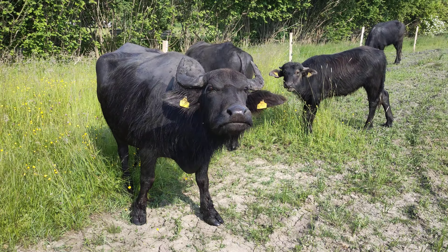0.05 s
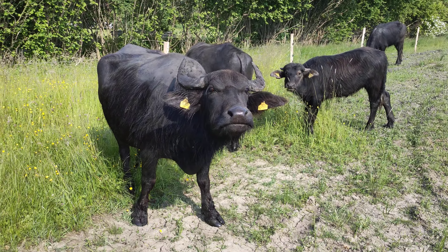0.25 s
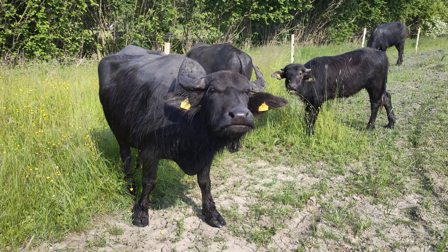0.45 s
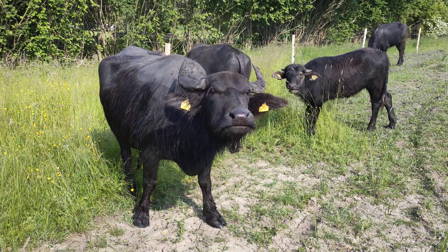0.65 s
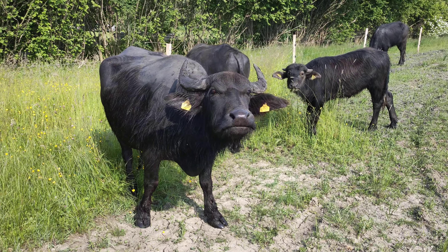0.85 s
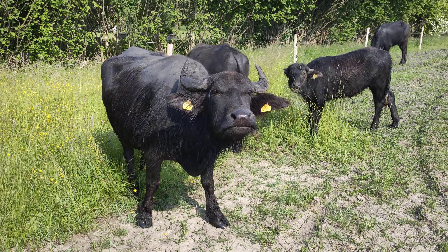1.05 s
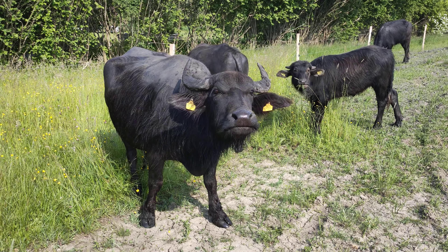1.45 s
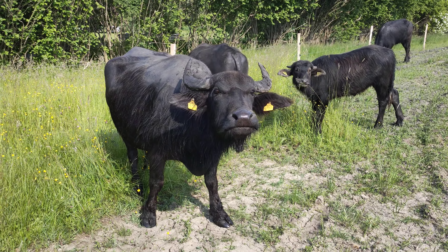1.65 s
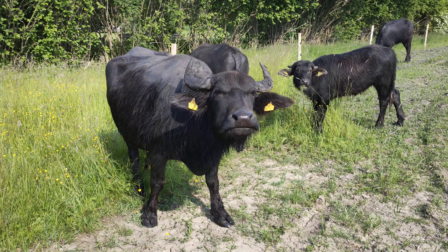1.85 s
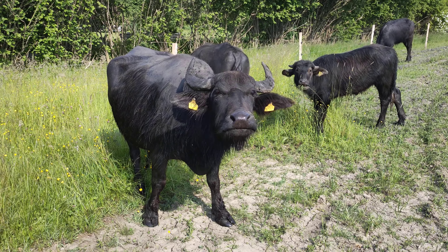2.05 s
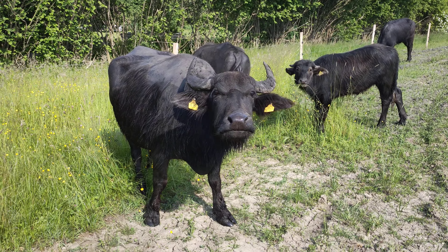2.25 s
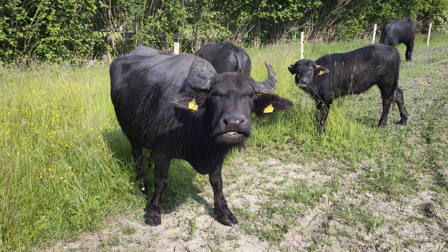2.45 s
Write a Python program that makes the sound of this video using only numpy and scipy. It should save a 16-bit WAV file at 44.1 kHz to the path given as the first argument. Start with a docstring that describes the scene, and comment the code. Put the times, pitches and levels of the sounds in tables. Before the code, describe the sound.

Wind buffets the microphone with an uneven low rumble over faint meadow hiss. From about 0.25 seconds come dull thumps and ragged pops, strongest near 0.6, where a stalk snaps; distant birds chirp faintly. Dry grass rustles and ticks softly around 1 to 1.2 seconds. Gusts swell again from 1.5 to 1.8, then ease, with a faint grassy swish near 2.1 and more far chirps at 2.4.

```python
"""Wind buffets a microphone in a meadow where buffalo stand.
From the start the grass hisses, far birds call and turbulent eddies press on the ports as a lumpy rumble.
From 0.25 s come dull thumps, swirls and ragged pops that ring at the edge of a steep low cut.
A stalk snaps at 0.6 s, dry grass rustles and ticks near 1 s, and the gusts swell again at 1.5-1.8 s.
As they ease, a swish crosses the grass and the birds chirp once more."""
import sys
import numpy as np
from scipy import signal
from scipy.fft import rfft, irfft
from scipy.io import wavfile
from scipy.ndimage import uniform_filter1d

SR = 44100
rng = np.random.default_rng(int(sys.argv[2]) if len(sys.argv) > 2 else 0)


def wav_record(signal):
    """Record a signal, one row per channel, as 16-bit PCM in the file named by sys.argv[1]."""
    frames = np.transpose(np.atleast_2d(signal))
    bounded = np.clip(frames, -1, 1)
    # unit amplitude maps onto the largest positive 16-bit level
    quanta = np.round(bounded * 32767).astype(np.int16)
    wavfile.write(sys.argv[1], SR, quanta)


N = 110250
T, HZ = np.arange(N) / SR, np.fft.rfftfreq(N, 1 / SR)


def amp(db):
    """Amplitude ratio of a level in decibels."""
    return 10 ** (np.asarray(db) / 20)


def unit_rms(x):
    """Normalisation to unit mean power."""
    return x / np.sqrt(np.mean(x ** 2) + 1e-20)


def colour(points):
    """Spectral envelope, interpolated in dB over log frequency."""
    hz, db = np.transpose(points)
    return amp(np.interp(np.log(HZ + 1), np.log(hz), db))


def level(points):
    """Amplitude envelope, interpolated in dB over time."""
    return amp(np.interp(T, *np.transpose(points)))


def drift(rate_hz):
    """Random modulation: low-passed noise of rms 1."""
    return unit_rms(irfft(rfft(rng.standard_normal(N)) * np.exp(-(HZ / rate_hz) ** 2), N))


def noise(gain, coherence):
    """Partial coherence: two ports receive the sum and difference of two coloured noises."""
    mid, side = irfft(rfft(rng.standard_normal((2, N))) * gain, N)
    mid, side = mid * np.sqrt(1 + coherence), side * np.sqrt(1 - coherence)
    return unit_rms(np.array([mid + side, mid - side]))


def eddies(spectrum, coherence, lump_db, lump_hz, span_s):
    """Intermittency: pressure comes in quick lumps whose power holds steady over a longer span."""
    pressure = noise(colour(spectrum), coherence) * amp(lump_db * drift(lump_hz))
    size = int(span_s * SR)
    power = uniform_filter1d(uniform_filter1d((pressure ** 2).mean(0), size), size)
    return pressure / np.sqrt(abs(power) + 1e-9)


# Spectra of the steady hiss and the swishes. Each row: frequency in Hz, relative level in dB.
HISS_SPECTRUM = [(120, -33), (250, -36), (400, -15), (470, -15.5), (700, -12), (1100, -8), (1350, -13),
                 (1800, -14), (2750, -23), (4000, -20.5), (6000, -26.5), (7600, -24), (8800, -34),
                 (11000, -29.5), (12600, -32.5), (13500, -26.5), (15500, -27.5)]
SWISH_SPECTRUM = [(2000, -7), (3200, -8), (4400, 3), (5800, -11), (7700, 4.5), (8700, -12), (11000, -5),
                  (12500, -11), (13600, -3), (16000, -7)]
# Waves of hiss. Each row: centre in seconds, level in dB, Gaussian half width in seconds.
SWISH_WAVES = [(0.24, -72.5, 0.14), (1.918, -75, 0.089), (2.131, -64.5, 0.076)]


def grass():
    """Flow noise: air over the grass makes a steady hiss and passing swishes."""
    hiss = amp(-66) * noise(colour(HISS_SPECTRUM), coherence=0.068)
    waves = sum(amp(db) * np.exp(-.5 * ((T - s) / half) ** 2) for s, db, half in SWISH_WAVES)
    return hiss + waves * noise(colour(SWISH_SPECTRUM), coherence=0.18)


# Pressure of large, medium and fine eddies. Each row: time in seconds, relative level in dB.
RUMBLE_LEVELS = [(0.0, -70), (0.14, -40), (0.2, -66), (0.24, -41), (0.28, -44.5), (0.33, -37), (0.35, -53),
                 (0.41, -48.5), (0.5, -50.5), (0.55, -53), (0.58, -37.5), (0.77, -44), (0.79, -40.5),
                 (0.84, -54.5), (0.99, -39), (1.18, -42), (1.2, -54.5), (1.27, -39.5), (1.36, -49),
                 (1.43, -38.5), (1.48, -44.5), (1.51, -34), (1.55, -49), (1.59, -33.5), (1.63, -44),
                 (1.68, -32.5), (1.73, -51.5), (1.77, -38), (1.83, -45), (1.93, -53.5), (2.08, -38),
                 (2.28, -60), (2.35, -58.5), (2.38, -43.5), (2.5, -59)]
BUFFET_LEVELS = [(0, -79), (.15, -52.5), (.21, -78), (.25, -43.5), (.3, -56), (.36, -67), (.55, -71.5),
                 (.58, -47), (.67, -45), (.83, -70.5), (.91, -42), (.95, -55.5), (1.12, -44), (1.21, -65),
                 (1.27, -50.5), (1.3, -64.5), (1.4, -39.5), (1.46, -61), (1.56, -30), (1.62, -45),
                 (1.645, -40.5), (1.68, -35), (1.73, -58), (1.77, -34.5), (1.91, -69), (1.96, -52.5),
                 (2.18, -47.5), (2.22, -68.5), (2.36, -73), (2.39, -55), (2.5, -75)]
FLUTTER_LEVELS = [(0, -72.5), (.22, -69.5), (.255, -53), (.305, -57), (.33, -45), (.365, -35.5), (.38, -50),
                  (.44, -43), (.51, -42), (.58, -47.5), (.62, -35.5), (.668, -52), (.69, -44.5), (.74, -65),
                  (.82, -66), (.865, -41.5), (.91, -52), (1.02, -64), (1.048, -45), (1.08, -65),
                  (1.16, -43.5), (1.21, -60), (1.26, -47), (1.35, -60.5), (1.39, -48.5), (1.44, -60),
                  (1.5, -53), (1.55, -44), (1.61, -52), (1.665, -34.5), (1.72, -56), (1.76, -49),
                  (1.95, -62), (2.01, -44.5), (2.07, -46.5), (2.12, -53.5), (2.3, -66), (2.5, -71)]
# Their spectra. Each row: frequency in Hz, relative level in dB.
RUMBLE_SPECTRUM = [(10, -21.5), (25, -8.5), (42, -3), (57, 0), (85, -4.5), (125, -7.5), (170, -17.5),
                   (260, -39.5), (450, -72), (900, -100)]
BUFFET_SPECTRUM = [(70, -33), (150, -1.5), (250, 0.5), (340, -10), (430, -14.5), (600, -38), (1200, -80)]
FLUTTER_SPECTRUM = [(300, -50.5), (420, -22.5), (475, 8.5), (650, -2), (900, -11), (1200, -19.5),
                    (1650, -22), (2200, -37), (3200, -71.5)]


def wind():
    """Coherence grows with eddy size: large eddies reach both ports alike, fine ones less so."""
    rumble = level(RUMBLE_LEVELS) * eddies(RUMBLE_SPECTRUM, 1, lump_db=2.5, lump_hz=25.3, span_s=0.038)
    buffet = level(BUFFET_LEVELS) * eddies(BUFFET_SPECTRUM, 1, lump_db=7, lump_hz=55.4, span_s=0.027)
    fine = eddies(FLUTTER_SPECTRUM, 0.79, lump_db=2.5, lump_hz=110, span_s=0.054)
    flutter = level(FLUTTER_LEVELS) * fine
    return amp(2) * rumble + amp(-1.5) * buffet + amp(-2.5) * flutter


# Far bird calls. Each row: start and length in seconds, centre pitch in Hz,
# glide as a fraction of that pitch, relative level in dB.
BIRD_CALLS = [(.198, .02, 3600, .15, -67), (.218, .02, 3480, -.22, -67), (.306, .024, 3550, -.2, -57),
              (.373, .022, 3620, .14, -59), (.398, .022, 3530, -.15, -61), (.484, .022, 3750, -.18, -61),
              (.512, .03, 3800, .1, -60), (.563, .03, 3450, -.18, -60), (.642, .028, 6050, -.1, -73),
              (1.283, .025, 5230, .01, -71), (1.518, .085, 5230, .055, -69.5),
              (2.382, .02, 3250, -.22, -65), (2.394, .014, 4130, -.12, -61), (2.431, .017, 4130, .05, -61),
              (2.448, .028, 3350, -.33, -62), (.0, .15, 1390, -.01, -58.5), (.69, .17, 1745, .01, -65),
              (2.41, .07, 1520, .03, -64)]


def birds(rasp_hz=380, trees_t60_s=.28):
    """Reverberation: clear glides arrive directly while their rasp lingers among the trees."""
    song = np.zeros(N)
    for start, length, hz, glide, db in BIRD_CALLS:
        progress = np.clip((T - start) / length, 0, 1)
        pitch = hz * (1 + glide * (progress - .5))
        song += amp(db) * np.sin(np.pi * progress) * np.sin(2 * np.pi * np.cumsum(pitch) / SR)
    tail = rng.standard_normal((2, SR // 2)) * np.exp(-np.log(1000) * T[:SR // 2] / trees_t60_s)
    rasp = song * drift(rasp_hz)
    reverb = signal.fftconvolve(rasp[None], tail / np.linalg.norm(tail[0]), axes=1)[:, :N]
    return amp(-5.5) * song + amp(-4.5) * reverb


# Bands of far sound. Each row: centre and half length in seconds, pitch and half width in Hz,
# level in dB.
HAZE_BANDS = [(.15, .45, 1900, 550, -70), (.3, .08, 4900, 900, -73), (.43, .25, 3750, 550, -72.5),
              (1.83, .05, 3800, 550, -74), (2.44, .08, 4150, 900, -75)]


def far_haze():
    """Narrow-band noise: birdsong and other far sounds blur into bands that swell and fade."""
    out = np.zeros((2, N))
    for centre, half, hz, width, db in HAZE_BANDS:
        swell = amp(db) * np.exp(-((T - centre) / half) ** 2)
        out += swell * noise(np.exp(-((HZ - hz) / width) ** 2), coherence=0.47)
    return out


# Eddies bursting at the ports. Each row: time in seconds, level in dB, dullness in dB per kHz
# (negative for a thin crack), share of the bass that passes from 0 to 1.
POP_BURSTS = [(.2495, -37.5, 41, 0.094), (0.3472, -27, 1, 0.48), (0.3516, -19, 2.5, 0.039),
              (0.3576, -24.5, 19, 0.013), (.442, -23.5, 12.5, 0.041), (0.4505, -21, 2, 0.038),
              (.457, -22.5, -35, 0.15), (.4598, -21.5, 15, 0), (0.4713, -27.5, -24.5, 0.086),
              (0.4847, -27, 4, 0), (0.5025, -22.5, 12.5, 0.066), (0.514, -22.5, 8, 0.1),
              (.5178, -32, 18, 0.13), (0.5331, -35, 14, 0.18), (.553, -32.5, 19.5, 0.16),
              (0.5986, -11.5, -3, 0), (0.6002, -17, 26, 0), (0.6237, -39, 13.5, 0.3),
              (.716, -38, 50.5, 0.0038), (.867, -29, 4, 0), (0.8716, -24, 53, 0.034),
              (0.8873, -35.5, -4, 0.15), (1.0445, -43, 8, 0.27), (1.0509, -29, 31, 0.064),
              (1.197, -40, 18, 0.089), (1.5213, -24.5, -13, 0.36), (1.5512, -28, 24, 0.82),
              (1.558, -30.5, 7, 1), (1.5631, -29.5, 5, 0.95), (1.6336, -30.5, 31, 0.42),
              (1.669, -12, -14.5, 0.35), (1.7525, -37, 5, .1), (2.0228, -38, 37, 0.019), (2.047, -37, 4, 0),
              (2.068, -36.5, 3, 0), (2.096, -41, -20, 0.2)]
# Spectrum of a pop before dulling and low cut. Each row: frequency in Hz, relative level in dB.
POP_SPECTRUM = [(30, -10.5), (150, -14), (480, 5), (680, 0.5), (980, -2), (1230, -13.5), (1650, -14),
                (2050, -30), (2700, -51.5), (4200, -79)]


def pops(cut_hz=468.6, edge_hz=11.5, ring_hz=45, wake_s=0.0035, port_lag_s=.00004, tilt_db=0.47):
    """Impulse response: pressure spikes in ragged wakes ring at the peaked edge of a steep low cut."""
    size = 8192
    bins = np.linspace(0, len(HZ) - 1, size // 2 + 1).astype(int)
    hz, t = np.fft.rfftfreq(size, 1 / SR), (np.arange(size) - size // 2) / SR
    edge = .5 + .5 * np.tanh((HZ - cut_hz) / (2 * edge_hz))
    resonance = 1 + 0.81 * np.exp(-abs(HZ - cut_hz) / ring_hz)
    shape, low_cut = colour(POP_SPECTRUM)[bins], (edge * resonance)[bins]
    ports = amp([[tilt_db], [-tilt_db]]) * np.exp(2j * np.pi * hz * [[0], [port_lag_s]])
    impulse = rfft(1. * (t == 0))
    out = np.zeros((2, N))
    for time, db, dull_db, bass in POP_BURSTS:
        cut_share = 1 - bass
        wake = rng.standard_normal(size) * np.exp(-(t / wake_s) ** 2)
        spike = impulse * np.exp(1j * cut_share)  # up to 1 radian turns part of the push into suction
        burst = spike + 0.4 * cut_share * rfft(wake / np.linalg.norm(wake))
        khz = np.minimum(hz / 1000, 3 if dull_db > 0 else 1)  # the slope levels off above this
        response = shape * amp(-dull_db * khz) * (bass + cut_share * low_cut)
        start = round(time * SR) - size // 2
        out[:, start:start + size] += irfft(amp(db) * ports * burst * response / response.mean(), size)
    return out


# Pushes on the membrane. Each row: centre in seconds, envelope peak in dB, pitch in Hz,
# half length in seconds.
THUMP_PULSES = [(0.252, -34, 55, 0.014), (0.334, -28.5, 64.4, 0.018), (0.585, -27.5, 61.5, 0.01),
                (.912, -25, 270, 0.0029), (1.65, -26, 312, 0.0037), (1.675, -28, 110, 0.0056),
                (1.77, -24, 165, 0.003)]


def thumps():
    """Wave packets: a large eddy swings the pressure back and forth once or twice."""
    return sum(amp(db) * np.exp(-((T - s) / half) ** 2) * np.sin(2 * np.pi * hz * (T - s))
               for s, db, hz, half in THUMP_PULSES)


# Gusts curling between the ports. Each row: centre and half length in seconds, relative level in dB.
SWIRL_GUSTS = [(0.344, 0.019, -53.5), (0.595, 0.0055, -33), (0.626, 0.09, -54.5), (1.565, 0.034, -42.5),
               (1.674, 0.024, -55), (1.815, 0.038, -64)]
# Their spectrum. Each row: frequency in Hz, relative level in dB.
SWIRL_SPECTRUM = [(90, -35), (170, -18), (270, 6.5), (400, -1.5), (540, 11), (900, -27), (1600, -67.5)]


def swirls(tilt_db=2):
    """Antiphase pressure: curling air pushes on one port as it sucks at the other, more on the left."""
    strength = sum(amp(db) * np.exp(-((T - s) / half) ** 2) for s, half, db in SWIRL_GUSTS)
    pressure = eddies(SWIRL_SPECTRUM, coherence=-0.8, lump_db=2, lump_hz=60, span_s=0.015)
    return amp([[tilt_db], [-tilt_db]]) * strength * pressure


# Snapping stalks. Each row: start in seconds, relative level in dB, band centre in Hz,
# half width in octaves.
STALK_SNAPS = [(0.6186, -42, 7140, 1), (1.0265, -64.5, 4600, .6), (1.1007, -49.5, 5500, 0.51),
               (1.116, -65, 7500, .6), (1.155, -45, 5250, 0.1), (1.198, -54, 13700, .09),
               (1.528, -59, 10500, 0.4), (1.718, -55, 6000, 0.62)]
# Their shared spectrum. Each row: frequency in Hz, relative level in dB.
SNAP_SPECTRUM = [(1500, -9), (3000, 2), (3900, 10.5), (5400, -9), (7600, 0), (9500, -13), (15000, -11.5)]


def stalks(decay_s=0.0022):
    """Damped transients: each snap is a dry tick of noise in its own band, decaying exponentially."""
    out, shape = np.zeros((2, N)), colour(SNAP_SPECTRUM)
    for start, db, hz, octaves in STALK_SNAPS:
        band = np.exp(-.5 * (np.log2((HZ + 1) / hz) / octaves) ** 2)
        decay = (T >= start) * np.exp(-abs(T - start) / decay_s)
        out += .5 * amp(db) * decay * noise(shape * band, coherence=0.18)
    return out


# Envelope of the dry rustle. Each row: time in seconds, level in dB.
RUSTLE_LEVELS = [(.975, -90), (.985, -67), (1.05, -71.5), (1.105, -61.5), (1.16, -64.5), (1.2, -70.5),
                 (1.28, -87)]
# Its spectrum. Each row: frequency in Hz, relative level in dB.
RUSTLE_SPECTRUM = [(1000, -23), (1800, 8.5), (2700, -25.5), (3700, -12.5), (4800, 2.5), (6000, -5.5),
                   (7600, -4.5), (9000, -18), (15000, -15.5)]


def rustle():
    """Amplitude modulation: fast random swings of level give the dry grass its grain."""
    grains = eddies(RUSTLE_SPECTRUM, coherence=0.27, lump_db=4.5, lump_hz=300, span_s=0.14)
    return level(RUSTLE_LEVELS) * grains


def scene():
    """Superposition: wind pressure at the microphone adds to the sound of the quiet meadow."""
    gusts = wind() + pops() + thumps() + swirls()
    return gusts + grass() + rustle() + stalks() + birds() + far_haze()


def record(dry):
    """Band limiting: a linear-phase low-pass removes the highest treble."""
    low_pass = signal.firwin(511, cutoff=15720, window=("kaiser", 9), fs=SR)
    return signal.oaconvolve(dry, low_pass[None], "same")


dry = scene()
out = record(dry)
wav_record(out)
```